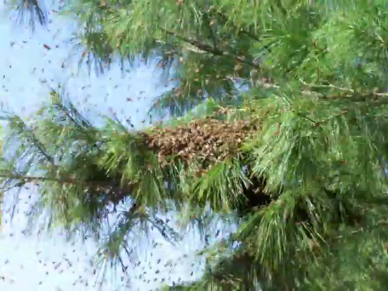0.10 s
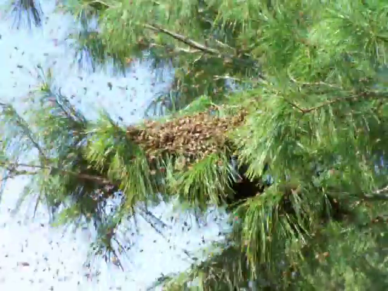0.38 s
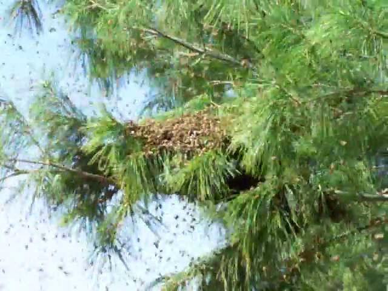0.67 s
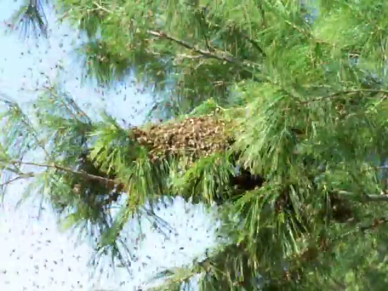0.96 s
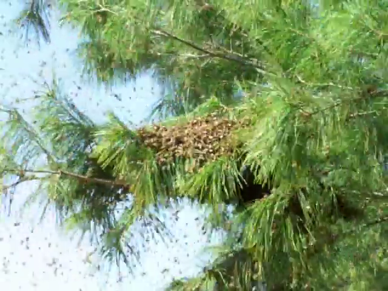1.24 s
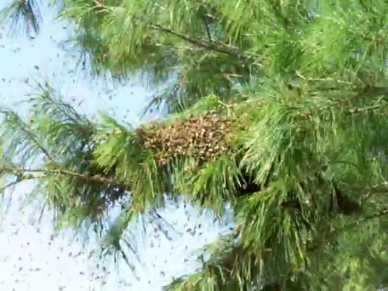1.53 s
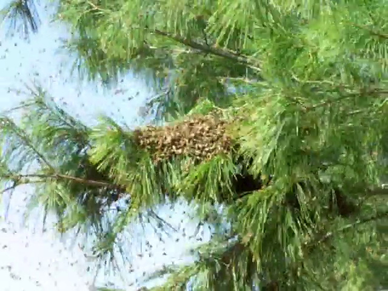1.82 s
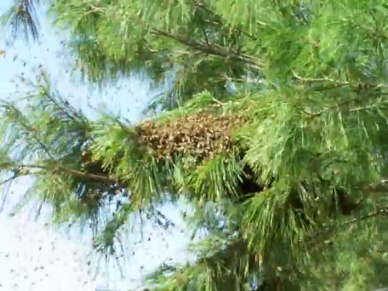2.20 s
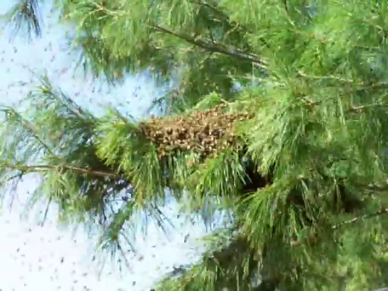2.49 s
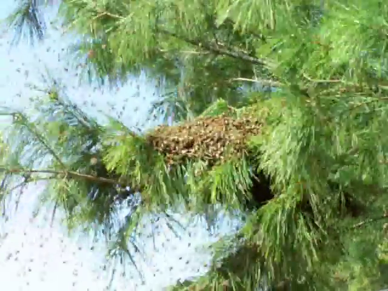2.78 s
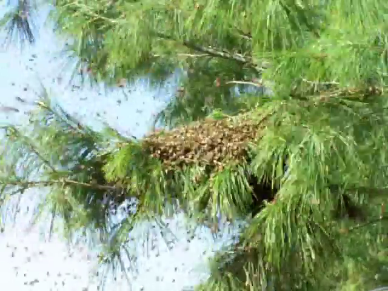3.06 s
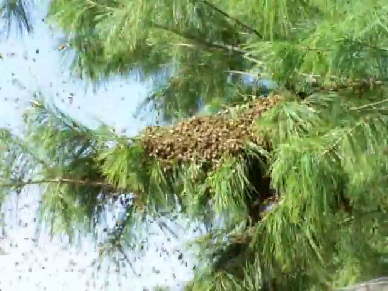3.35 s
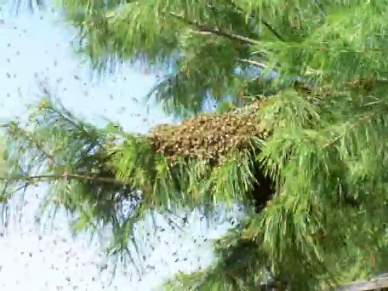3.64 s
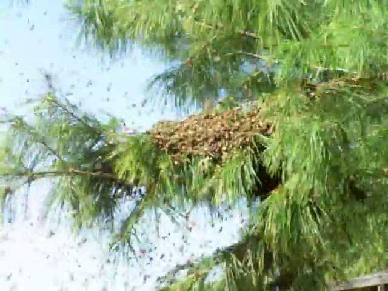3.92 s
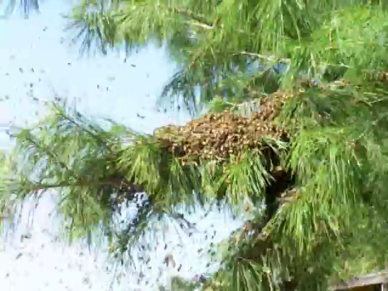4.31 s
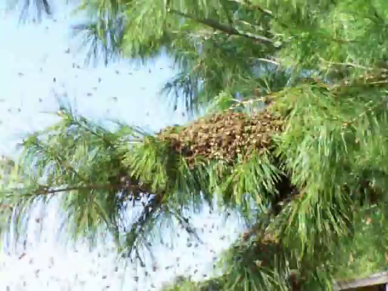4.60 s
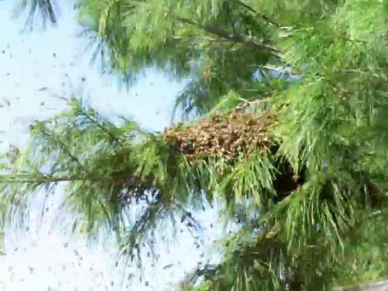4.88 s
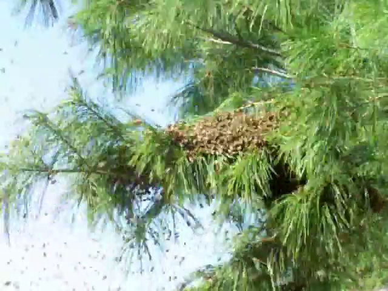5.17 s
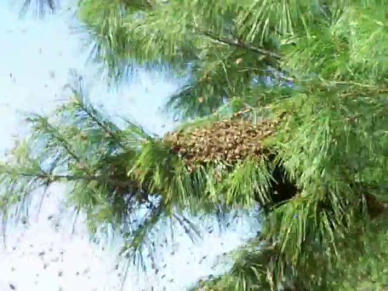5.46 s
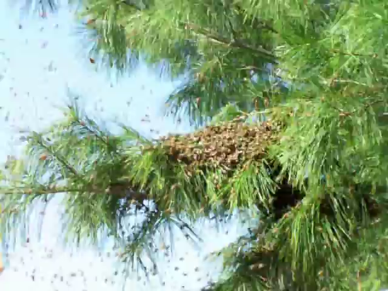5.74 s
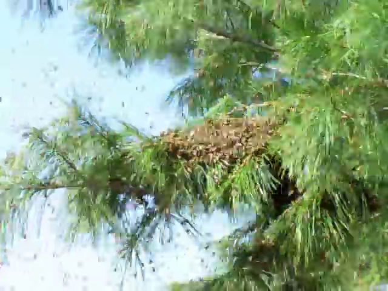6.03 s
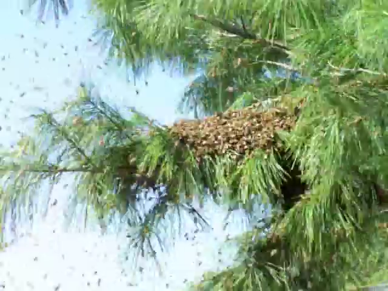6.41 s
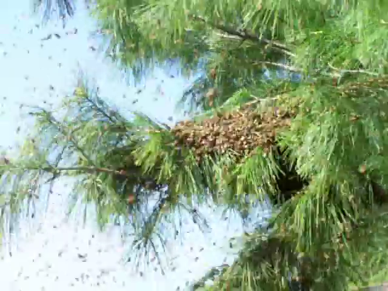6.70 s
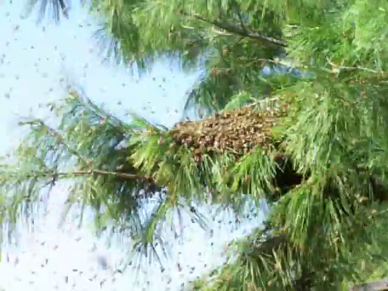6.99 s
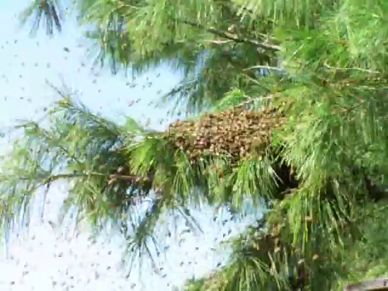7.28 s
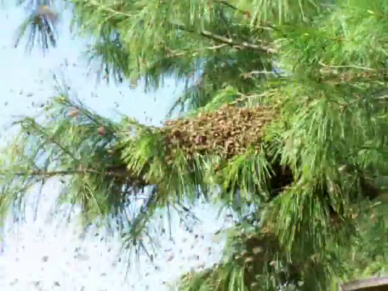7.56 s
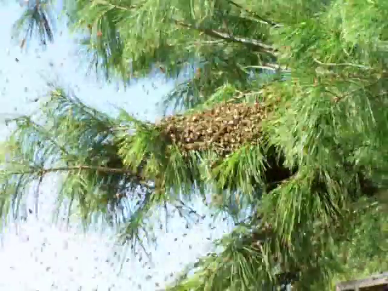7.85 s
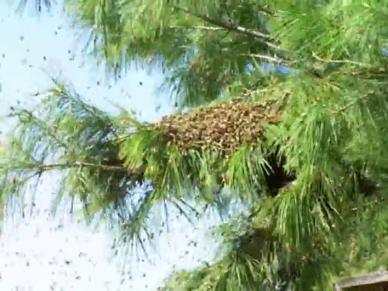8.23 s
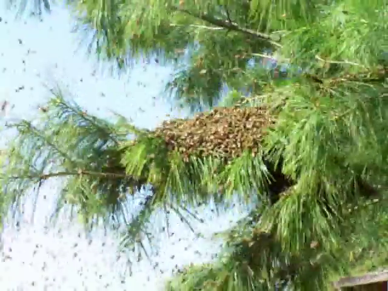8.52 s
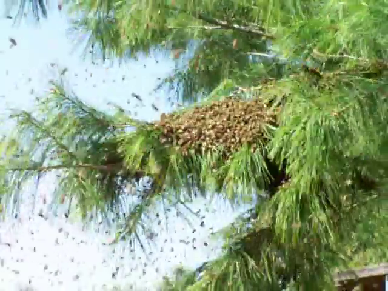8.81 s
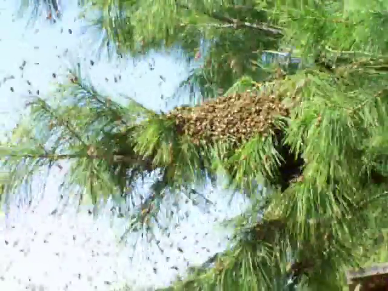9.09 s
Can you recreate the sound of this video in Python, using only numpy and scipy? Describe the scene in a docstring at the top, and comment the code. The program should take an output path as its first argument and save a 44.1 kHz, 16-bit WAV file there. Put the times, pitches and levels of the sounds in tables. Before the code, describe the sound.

A swarm of bees hums close by outdoors, with gusts buffeting the microphone and a distant bird rasping again and again.

```python
"""A hum of honey bees fades in, close by, as the swarm circles its cluster on a pine branch.
Their beating wings make the hum. Behind it lies a steady outdoor hiss, and a far engine drones.
Gusts arrive quickly, die away and throw eddies (small whirls of air) at the microphone;
the strongest overloads it and makes the gain control turn everything down for a moment.
A far bird rasps again and again, and a small one chirps."""
import sys
import numpy as np
from scipy import signal
from scipy.fft import rfft, irfft, next_fast_len
from scipy.io import wavfile
from scipy.ndimage import uniform_filter1d, map_coordinates

SR = 44100
rng = np.random.default_rng(int(sys.argv[2]) if len(sys.argv) > 2 else 0)


def bounce(signal):
    """Save signal as a 16-bit WAV file at the path given by the first command-line argument."""
    frames = np.transpose(np.atleast_2d(signal))
    limited = np.clip(frames, -1, 1)
    pcm = np.round(limited * 32767).astype(np.int16)
    wavfile.write(sys.argv[1], SR, pcm)


N = 403074
TIME = np.arange(N) / SR

# the overtones of one wing beat: harmonic_number, level_db
WING_BEAT = [(1, -2), (2, 1), (3, -3), (4, -2.5), (5, -1.5), (6, -5), (7, -7), (9, -19.5), (12, -13.5),
             (16, -10.5), (22, -12.5), (30, -30)]
# how busy the swarm is: time_s, level_db
SWARM_LEVEL = [(.7, -34), (2.7, -35), (4.7, -31.6), (6.2, -32), (7.5, -33.5), (9.1, -32)]
# outdoor hiss, coloured by the microphone's resonance near 3.7 kHz: frequency_hz, level_db
HISS_COLOUR = [(100, -12), (500, -8.5), (1000, -3), (1500, -11.5), (2200, -9), (2800, -7.5), (3300, -3),
               (3750, -0.5), (4400, -5), (5100, -8.5), (5900, -14), (7000, -17), (7700, -23), (8400, -31)]
# the hiss slowly grows a little louder: time_s, level_db
HISS_LEVEL = [(.7, -32.5), (5.3, -31.1), (9.1, -31.5)]
# the far engine's tones: pitch_hz, level_db
ENGINE_TONES = [(58.5, -50.5), (73, -47), (77, -52), (98, -49.5), (103.5, -51), (106.3, -46), (122.3, -39),
                (146.8, -51), (153.7, -52.5)]
# how those tones swell together: time_s, gain_db
ENGINE_SWELL = [(1, -4.5), (4, -3), (5.5, -0.5), (9, .5)]
# the tone colour of the distant outdoor rumble: frequency_hz, level_db
RUMBLE_COLOUR = [(5, -29), (16, -5.5), (50, -3.5), (100, -5), (170, -6.5), (320, -9.5), (700, -16),
                 (2000, -45.5)]
# gusts on the microphone: peak_s, level_db, fall_db_per_s
WIND_GUSTS = [(.86, -38, 5.5), (1.48, -38, 22), (2.13, -9, 44), (2.8, -25, 15), (3.44, -23.5, 28)]
# the strongest eddies: peak_s, level_db, half_width_s
WIND_EDDIES = [(1.025, -25.5, .023), (1.441, -23, 0.011), (1.501, -23, 0.013), (1.663, -23.5, 0.0099),
               (2.128, -4.5, 0.0056), (2.167, -2, 0.0085), (2.19, -2.5, 0.005), (2.204, -4.5, 0.0059),
               (2.276, -7, 0.0082), (2.422, -8, 0.0076), (2.501, -18, 0.0067), (2.775, -15.5, 0.017),
               (2.84, -18, .018), (2.883, -10.5, 0.011), (2.927, -15.5, 0.0099), (2.981, -20, 0.0055),
               (3.09, -22, .014), (3.17, -19.5, .01), (3.278, -17, 0.0078), (3.455, -18.5, 0.029),
               (3.535, -9.5, 0.013), (3.577, -18, .004), (4.5, -35, 0.018)]
# the tone colours of slow, fast and fastest air on the microphone: frequency_hz, level_db
THUMP_COLOUR = [(8, -24.5), (25, -6), (45, -1), (70, -2), (115, -4.5), (190, -13), (320, -30), (550, -44.5),
                (1200, -71.5), (3000, -100)]
FLUTTER_COLOUR = [(40, -14), (140, -3.5), (250, -2.5), (450, -13), (800, -31.5), (1500, -51.5), (3000, -88)]
TEARING_COLOUR = [(150, -26), (500, 5.5), (900, -2.5), (1600, -10.5), (2400, -28.5), (4000, -52.5)]
# the far bird's rasping calls: middle_s, half_width_s, pitch_hz, level_db
BIRD_RASPS = [(1.88, 0.33, 1750, -41.5), (3.52, 0.25, 1590, -39), (3.9, 0.082, 1540, -39),
              (4.73, 0.22, 1704, -36.5), (6.17, 0.25, 1605, -37), (7.39, 0.18, 1770, -36),
              (9.1, 0.24, 1630, -38)]
# the small bird's falling chirps: start_s, length_s, start_pitch_hz, level_db
BIRD_CHIRPS = [(2.56, 0.11, 2960, -41.5), (2.925, 0.08, 2880, -43), (8.61, 0.055, 3890, -31.5),
               (8.68, .07, 2880, -42), (8.92, 0.099, 3350, -44), (9.05, .08, 2950, -37)]


def amp(db):
    """Turn decibels into a number to multiply by."""
    return 10 ** (np.asarray(db) / 20)


def unit(x):
    """Scale a sound to an average (rms) level of 1."""
    return x / np.sqrt(np.mean(x ** 2) + 1e-20)


def along(points, at):
    """Read between (x, value) points, with x on a log scale."""
    x, value = np.transpose(points)
    return np.interp(np.log(at + 1e-6), np.log(x), value)


def gain_curve(rows):
    """Join (time_s, level_db) points into one gain per sample."""
    return amp(np.interp(TIME, *np.transpose(rows)))


def wobble(rate, t=TIME):
    """A smooth curve through `rate` random values a second."""
    return map_coordinates(rng.standard_normal(8192), [t * rate], mode="mirror")


def filtered(x, response):
    """Scale each frequency in x by response(hz)."""
    size = next_fast_len(N + 8192)
    return irfft(rfft(x, size) * response(np.fft.rfftfreq(size, 1 / SR)), size)[:N]


def noise(colour):
    """Noise at level 1 with the given tone colour."""
    return unit(filtered(rng.standard_normal(N), lambda hz: amp(along(colour, hz))))


def even(x, window_samples=1100):
    """Smooth out the swells in noise, so each eddy pushes with its full force."""
    return x / np.sqrt(np.abs(uniform_filter1d(x ** 2, size=window_samples)) + 0.038)


def bell(x, centre, width):
    """A smooth hump of height 1."""
    return np.exp(-.5 * np.minimum(np.abs(x - centre) / width, 10) ** 2)


def bee_swarm(wing_hz=230, nearness_db=3.0, count=48):
    """Each bee beats its wings at its own rate, which bends as it turns; it grows louder when near."""
    spread, turning, steering = .038, .044, .022  # as fractions of the wing rate
    harmonics = amp(along(WING_BEAT, np.arange(1, 31)))
    slow_time = np.linspace(0, TIME[-1], num=1400)
    # pick bees evenly, from slow-winged to fast-winged
    offsets = np.sort(rng.standard_normal(count * count))[count // 2::count]
    hum = np.zeros(N)
    for offset in offsets:
        phases = np.exp(2j * np.pi * rng.random(len(harmonics)))
        beat = irfft(np.r_[0, harmonics * phases], 4096)  # the wave of one wing beat
        bend = turning * wobble(3, slow_time) + steering * wobble(28, slow_time)
        hz = wing_hz * np.exp(spread * offset + bend)
        nearness = amp(nearness_db * wobble(3.5, slow_time))
        beats_so_far = np.interp(TIME, slow_time, np.cumsum(hz) * slow_time[1])
        buzz = beat[(beats_so_far * len(beat)).astype(int) % len(beat)]
        hum += np.interp(TIME, slow_time, nearness) * buzz
    return gain_curve(SWARM_LEVEL) * unit(hum)


def outdoor_hiss(flicker_db=0.24):
    """A steady outdoor hiss, coloured by the microphone's resonance near 3.7 kHz."""
    return gain_curve(HISS_LEVEL) * noise(HISS_COLOUR) * amp(flicker_db * wobble(14))


def far_engine(drift_radians=1.0, rumble_db=-43):
    """A far engine holds a few low, unsteady tones over the outdoor rumble."""
    slow_time = np.linspace(0, TIME[-1], num=400)
    tones = np.zeros(N)
    for hz, db in ENGINE_TONES:
        drift = drift_radians * np.interp(TIME, slow_time, wobble(3, slow_time))
        tones += amp(db) * np.sin(2 * np.pi * hz * TIME + drift)
    return gain_curve(ENGINE_SWELL) * tones + amp(rumble_db) * noise(RUMBLE_COLOUR)


def gust_force(rise_db_per_s=449, swirl_db=1.5):
    """Each gust rises quickly and dies away, swirling as it goes."""
    power = np.zeros(N)
    for peak_s, db, fall_db_per_s in WIND_GUSTS:
        below_peak_db = np.maximum(rise_db_per_s * (peak_s - TIME), fall_db_per_s * (TIME - peak_s))
        power += amp(db - below_peak_db) ** 2
    return np.sqrt(power) * amp(swirl_db * wobble(28))


def wind_on_microphone(flutter_db=6.5, loss_db_per_s=781, steepness=1.225, tearing_db=-11):
    """Gusts and eddies thump the microphone; briefer eddies flutter more, and the fastest air tears."""
    gusts = gust_force()
    push_power = gusts ** 2
    fast_power = (amp(-3) * gusts) ** 2
    for peak_s, db, half_width_s in WIND_EDDIES:
        eddy_power = (amp(db) * bell(TIME, peak_s, half_width_s)) ** 2
        push_power += eddy_power
        fast_power += amp(flutter_db - loss_db_per_s * half_width_s) ** 2 * eddy_power
    thump = np.sqrt(push_power) * even(noise(THUMP_COLOUR))
    flutter = np.sqrt(fast_power) ** steepness * even(noise(FLUTTER_COLOUR))
    tearing = amp(tearing_db) * fast_power * noise(TEARING_COLOUR)
    return thump + flutter + tearing


def rasping_bird(whistle_width_hz=50, hoarse_width_hz=320, hoarse_ratio=1.055, hoarse_db=2):
    """Each far call is a thin whistle inside a broad, hoarse noise, smeared by the trees."""
    calls = np.zeros(N)
    hz = np.fft.rfftfreq(2 * SR, 1 / SR)
    for middle_s, half_width_s, pitch_hz, db in BIRD_RASPS:
        whistle = bell(hz, pitch_hz, whistle_width_hz) / np.sqrt(whistle_width_hz)
        hoarse = bell(hz, pitch_hz * hoarse_ratio, hoarse_width_hz) / np.sqrt(hoarse_width_hz)
        colour = np.hypot(whistle, amp(hoarse_db) * hoarse)
        rasp = unit(irfft(rfft(rng.standard_normal(2 * SR)) * colour))
        calls += amp(db) * bell(TIME, middle_s, half_width_s) * np.resize(rasp, N)
    return calls


def chirping_bird(fall_hz_per_s=6400, quaver=0.025, echo_db=-3.0, echo_s=0.22):
    """Short, rough whistles slide down in pitch and echo off the surrounding trees."""
    chirps = np.zeros(N + SR)
    for start_s, length_s, start_hz, db in BIRD_CHIRPS:
        t = np.arange(int(length_s * SR)) / SR
        hz = (start_hz - fall_hz_per_s * t) * (1 + quaver * wobble(400, t))
        swell = np.sqrt(2 * np.abs(np.sin(np.pi * t / length_s)))
        whistle = np.sin(2 * np.pi * np.cumsum(hz) / SR)
        chirps[int(start_s * SR):][:len(t)] += amp(db) * swell * whistle
    t = np.arange(SR // 2) / SR
    tail = rng.standard_normal(len(t)) * amp(-60 * t / echo_s)
    echo = signal.fftconvolve(chirps, tail / np.linalg.norm(tail))
    return chirps[:N] + amp(echo_db) * echo[:N]


def scene():
    """Bees and hiss in front, wind on the microphone, engine and birds far off, in one channel."""
    steady = bee_swarm() + outdoor_hiss() + far_engine()
    return (steady + wind_on_microphone() + rasping_bird() + chirping_bird())[None]


def gain_control(x, threshold_db=-8, recovery_db_per_s=30, window_samples=1800):
    """The volume drops when the sound gets too loud, then creeps back."""
    power = np.abs(signal.fftconvolve(x ** 2, np.ones(window_samples) / window_samples)[:N])
    excess_db = np.maximum(10 * np.log10(power + 1e-12) - threshold_db, 0)
    recovery_db = recovery_db_per_s * TIME
    return x * amp(recovery_db - np.maximum.accumulate(excess_db + recovery_db))


def record(dry):
    """Turn down loud moments, flatten overloaded peaks, fade in and cut the highest treble."""
    ceiling, top_hz = .7, 9150
    fade_start_s, fade_end_s, fade_from_db = .335, 0.77, -27.5
    limited = np.clip(gain_control(dry[0]), -ceiling, ceiling)
    fade_in = gain_curve([(fade_start_s, fade_from_db), (fade_end_s, 0)]) * (TIME > fade_start_s)
    return filtered(limited * fade_in, lambda hz: np.clip((top_hz - hz) / 900, 0, 1) ** 2)[None]


dry = scene()
out = record(dry)
bounce(out)
```